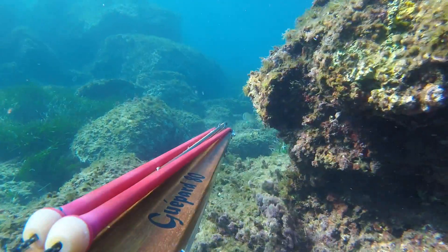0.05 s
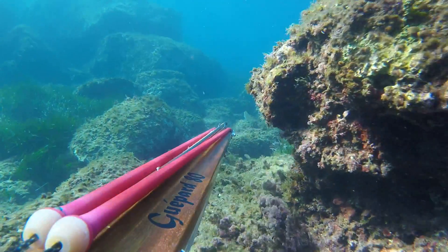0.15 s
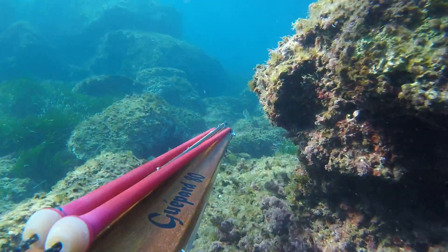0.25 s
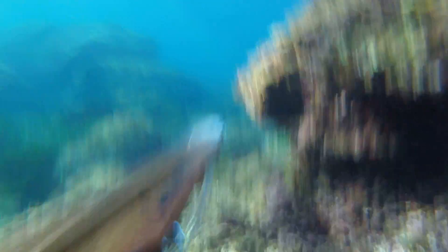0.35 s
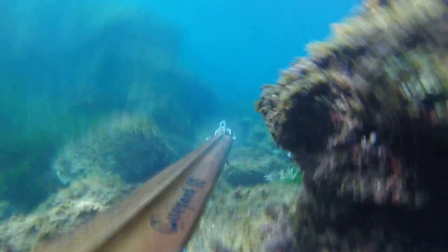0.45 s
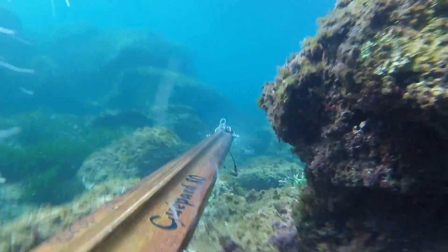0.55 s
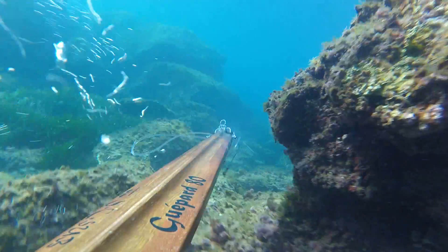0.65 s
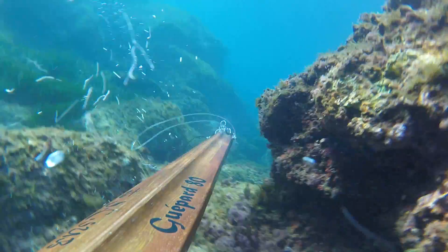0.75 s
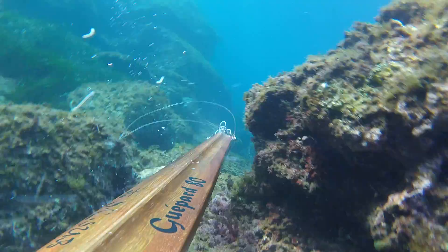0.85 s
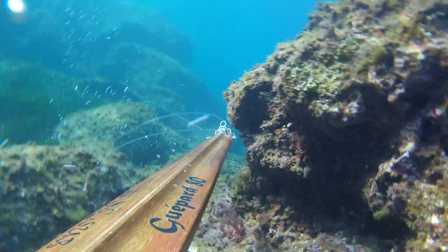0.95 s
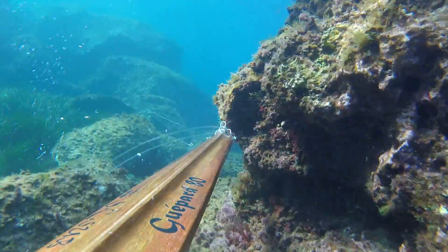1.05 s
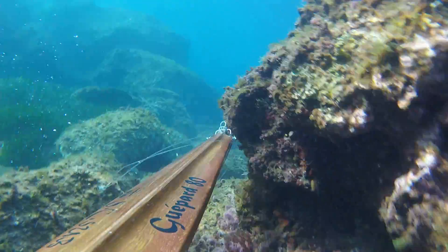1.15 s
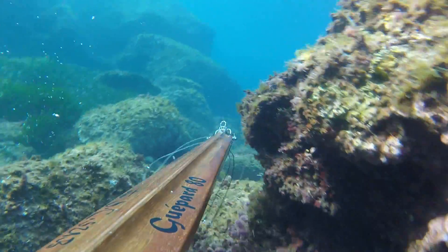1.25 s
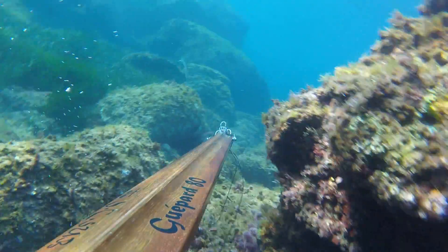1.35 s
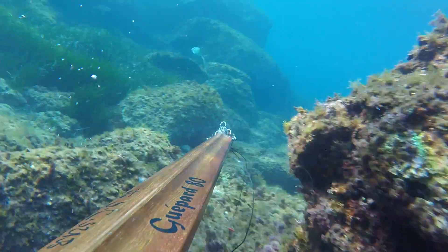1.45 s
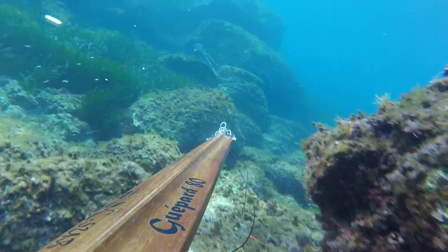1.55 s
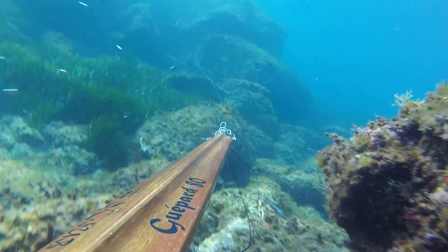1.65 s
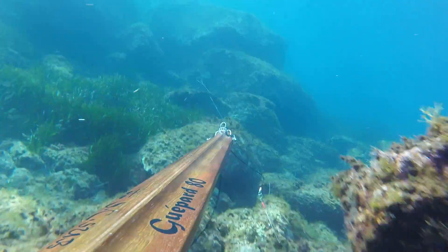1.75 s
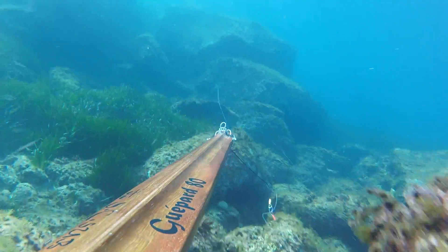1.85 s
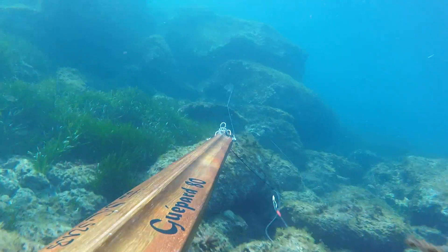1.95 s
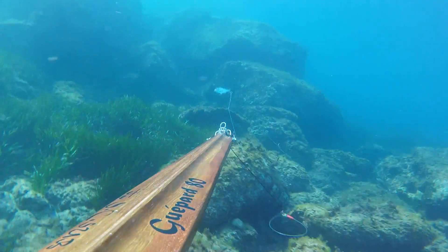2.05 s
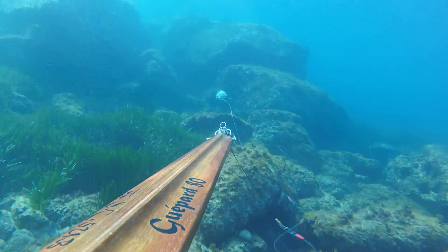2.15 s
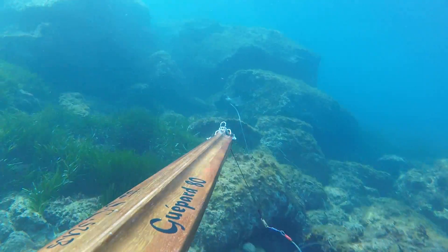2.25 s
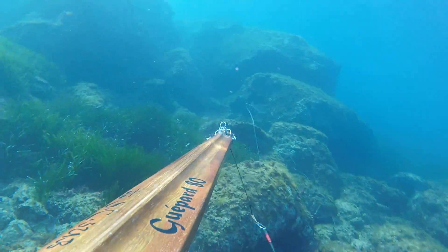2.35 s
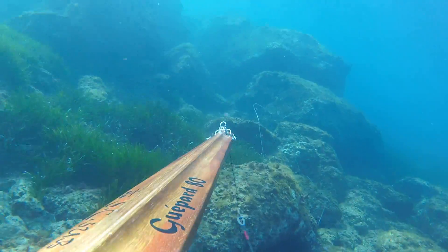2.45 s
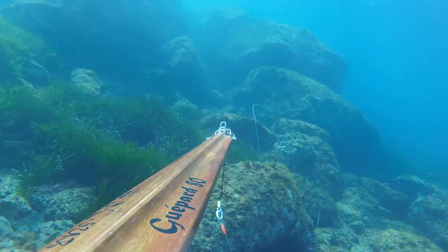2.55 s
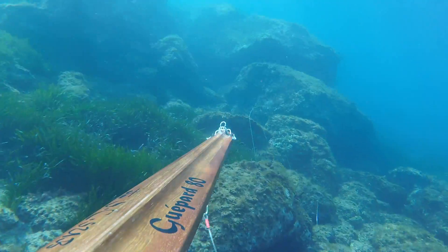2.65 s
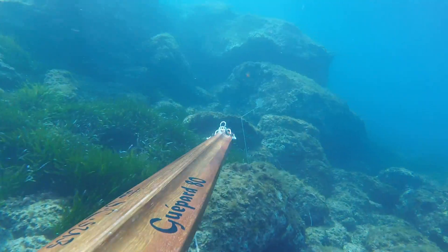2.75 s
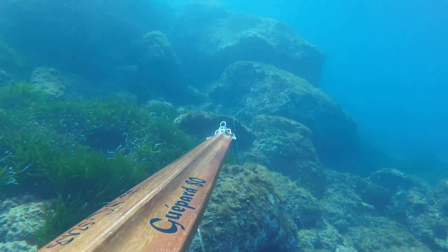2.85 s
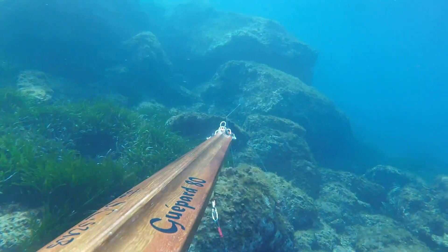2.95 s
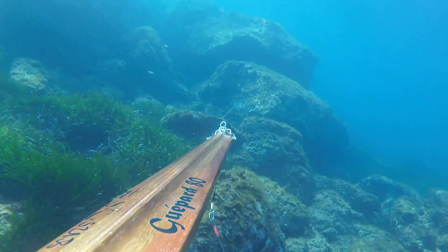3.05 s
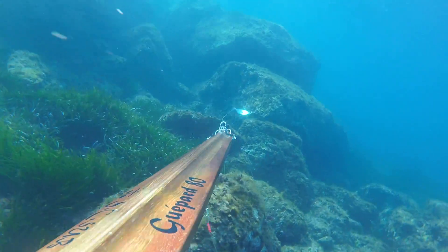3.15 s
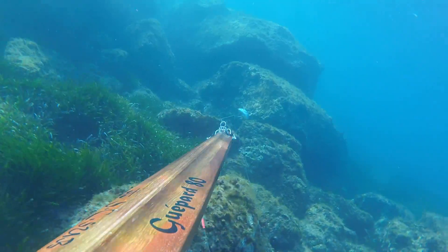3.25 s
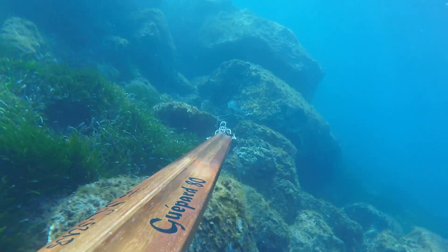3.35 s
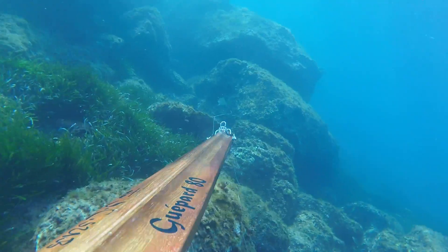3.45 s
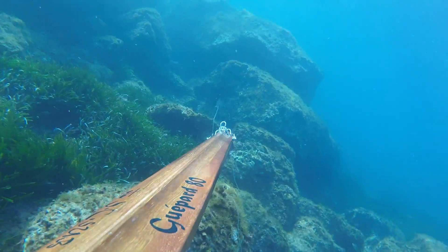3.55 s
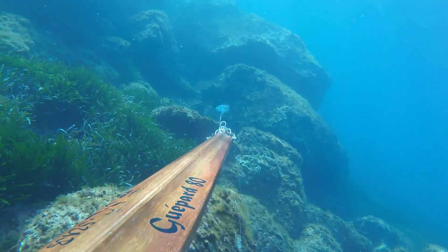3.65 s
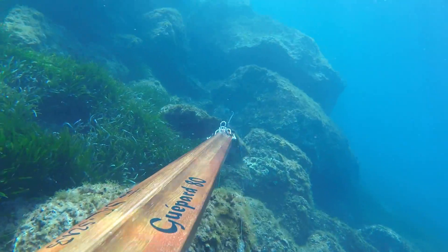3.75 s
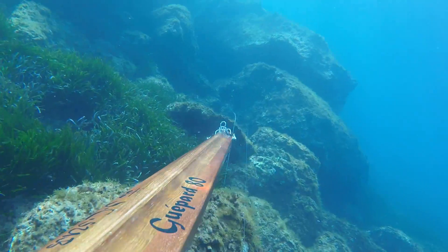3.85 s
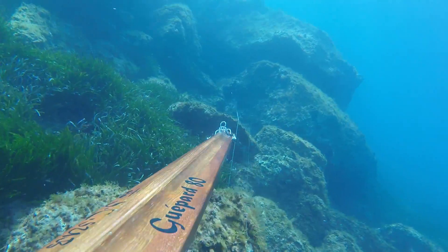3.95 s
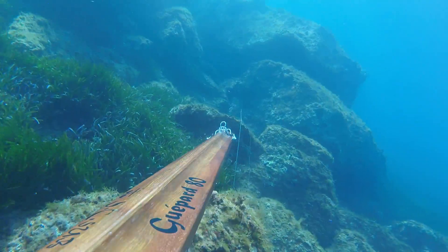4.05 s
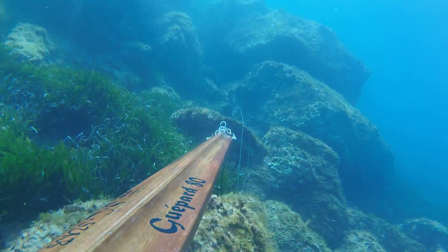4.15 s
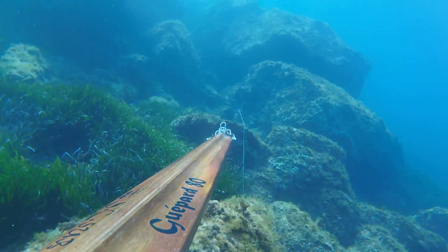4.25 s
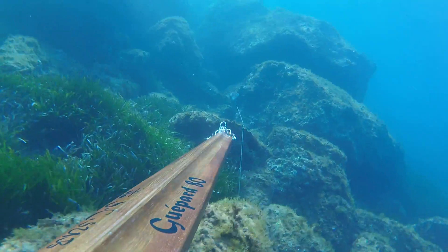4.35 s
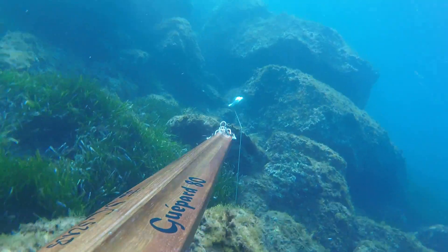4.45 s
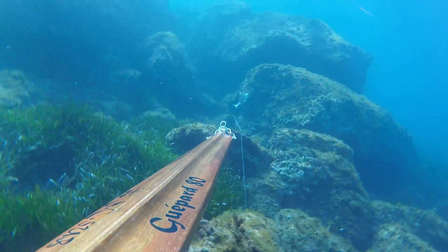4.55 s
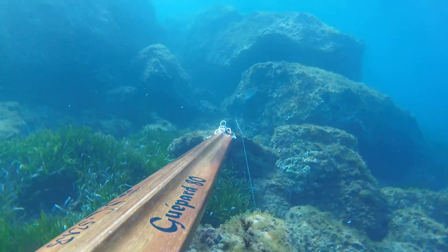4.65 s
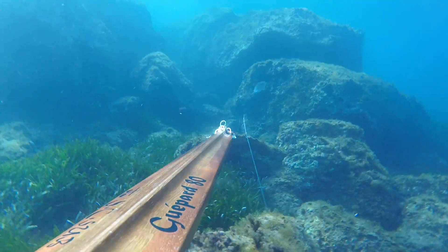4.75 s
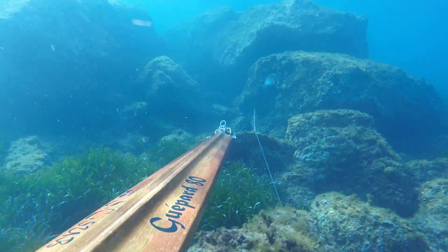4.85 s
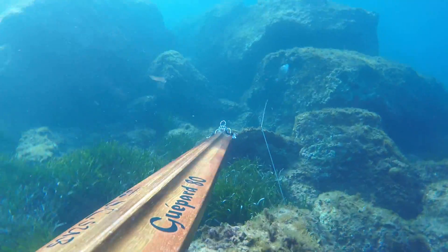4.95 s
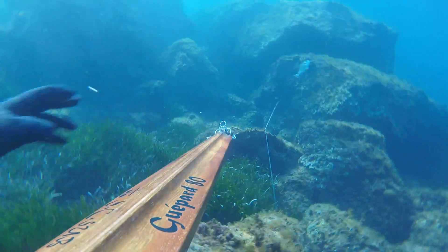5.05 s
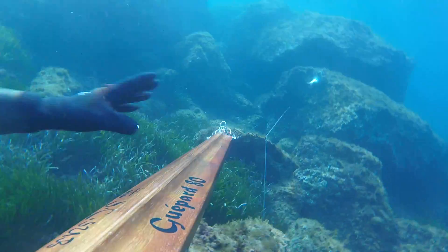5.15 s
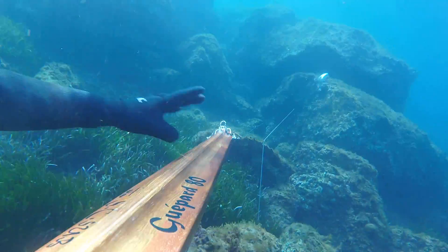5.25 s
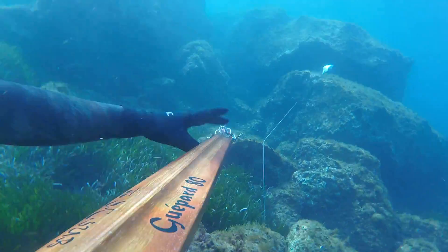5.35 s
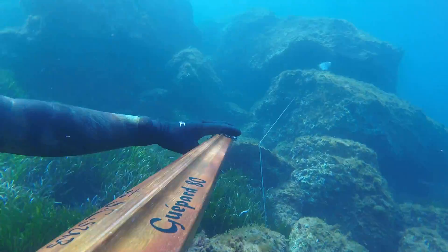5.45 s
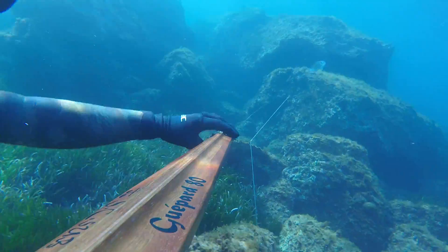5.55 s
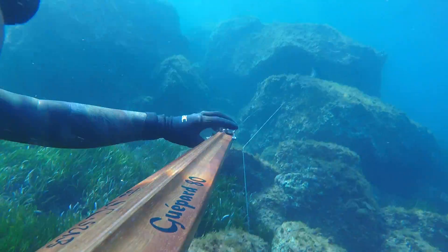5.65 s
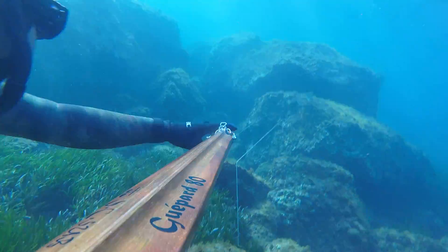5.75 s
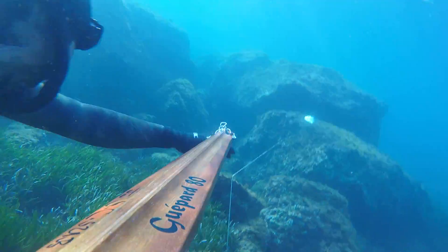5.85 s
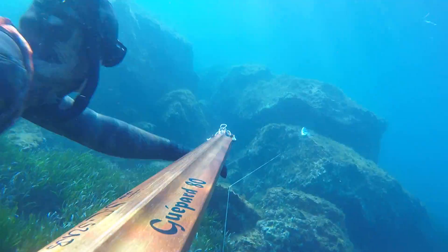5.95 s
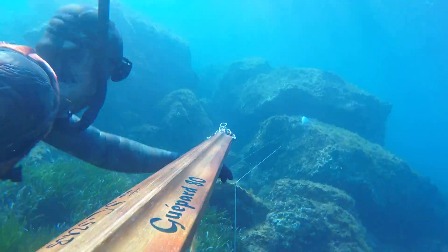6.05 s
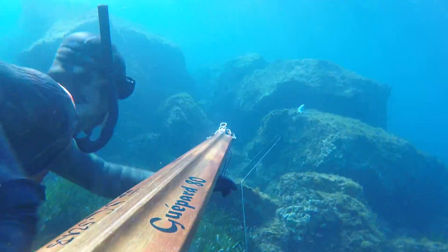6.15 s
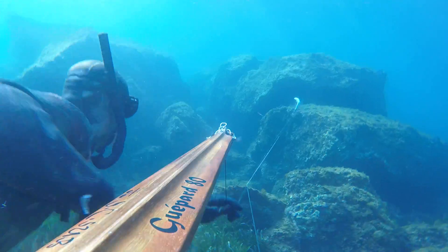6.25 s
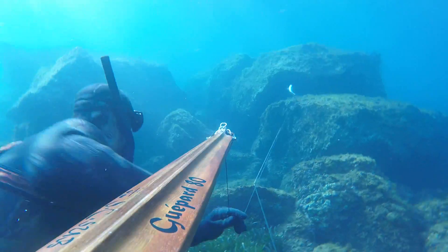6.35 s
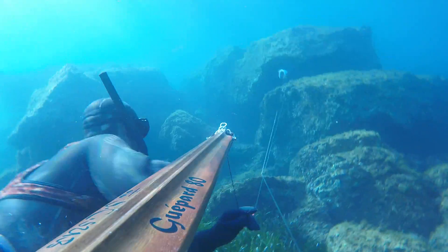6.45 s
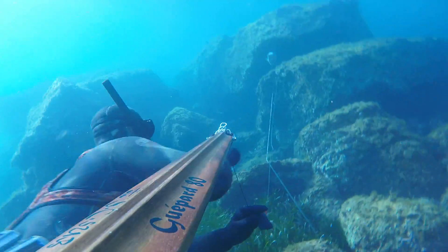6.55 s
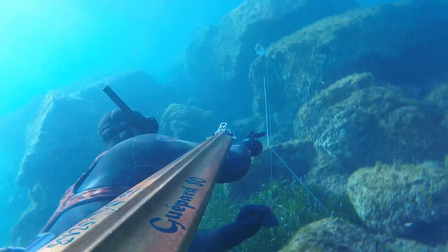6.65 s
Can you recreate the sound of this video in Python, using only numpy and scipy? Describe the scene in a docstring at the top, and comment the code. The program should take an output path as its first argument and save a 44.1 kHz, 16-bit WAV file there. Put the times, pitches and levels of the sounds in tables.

```python
"""Far shrimp crackle over a faint hiss, then a trigger clicks and a wooden speargun fires among rocks.
Place: under water. Distance: the microphone sits in a camera housing fixed to the gun's own stock.
The shot is cracks, filtered noise and pressure pulses; bubbles are sines, most gliding, over a fading fizz.
The gun trembles and the line tugs it; later the diver hauls himself forward; line, clips and hand rattle and rub.
Blows and slips are impulses with noise bursts, ringing the modes of the stock or the metal fittings."""
import sys
import numpy as np
from scipy import signal
from scipy.io import wavfile
from scipy.ndimage import uniform_filter1d

SR = 44100
rng = np.random.default_rng(int(sys.argv[2]) if len(sys.argv) > 2 else 0)


def to_wav(sig):
    """Store sig (one row per channel, or 1-D mono) as 16-bit WAV at the path in sys.argv[1].

    Samples outside -1..1 are clipped; the rate is SR.
    """
    pcm = np.clip(np.atleast_2d(sig), -1, 1) * 32767
    pcm = np.round(pcm).astype(np.int16)
    wavfile.write(sys.argv[1], SR, pcm.T)  # frames by channels


N = 295911
TIME = np.arange(N) / SR  # s from the start of the scene
AGE = np.arange(SR // 3) / SR  # s from the start of one event

# Table levels are relative: each source sets its own trims, and the housing wall colours the result.
# Event times of blows and snaps come before the short lag of their source.

# colour of the steady hiss: frequency_hz, density_db_per_hz
HISS_COLOUR = [(180, -2), (300, -7.5), (510, -6.5), (813, -23), (925, -25), (2130, -15), (3350, -21.5),
               (4540, -27), (5170, -16), (5970, -22.5), (6580, -14), (9370, -20.5), (10500, -29.5),
               (12300, -23), (14000, -59)]
# nearest shrimp: start_s, level_db
NEAREST_SNAPS = [(0.0563, -50), (0.2346, -48), (0.6908, -42.5), (1.084, -49.5), (1.4274, -46), (2.373, -45),
                 (2.6465, -42.5), (2.8, -36), (3.0167, -38.5), (3.4212, -36.5), (3.4545, -29.5),
                 (3.68, -40.5), (3.9492, -40.5), (4.258, -24), (4.361, -39), (4.5189, -39.5), (5.0785, -32),
                 (5.2639, -37)]
# colour of one shrimp snap: frequency_hz, gain_db
SNAP_COLOUR = [(600, -39), (1900, -0.5), (2700, -3), (4200, -9.5), (5300, 7.5), (5900, -4.5), (6400, 1.5),
               (7200, -10), (9300, -18), (10500, -66.5), (14000, -47.5)]
# colour of water rumbling past the housing: frequency_hz, gain_db
RUMBLE_COLOUR = [(8, -31), (20, -3.5), (31, -4.0), (45, -10.0), (70, -21.0), (150, -32), (400, -41), (1500, -104.5)]
# swings of the gun that push water past the housing: fastest_s, rise_s, fall_s, level_db
GUN_SWINGS = [(.32, 0.46, 0.091, -43), (.56, 0.084, 0.15, -26), (.92, .15, 0.64, -50),
              (1.68, .2, 0.39, -47.5), (2.0, 0.54, 0.5, -46.5), (2.52, 0.27, 0.37, -40.5),
              (3.25, 0.53, 0.18, -47.5), (4.42, 0.14, 0.17, -31), (4.63, 0.15, 0.31, -30),
              (5.2, 0.59, 0.4, -35.5), (5.54, 0.17, 0.23, -27), (5.87, 0.49, 0.98, -30.5)]
# colour of the fizz behind the shaft: frequency_hz, gain_db
FIZZ_COLOUR = [(300, 0.5), (1000, -2.5), (2500, -4.5), (6300, 0.0), (7800, -13), (10000, -29.0), (13000, -47.0)]
# single bubbles, wet squeaks and a faint steady ring, most with sliding pitch:
# start_s, peak_db, pitch_hz, glide_octaves_per_s, length_s
BUBBLES_AND_SQUEAKS = [(.1398, -34.5, 418, -7, 0.011), (.4855, -18, 950, -22.5, 0.011),
                       (0.612, -42, 8000, -39, 0.015), (0.666, -45, 3600, 8.5, 0.02),
                       (.743, -39, 6200, 0, 0.001), (0.755, -50.5, 2350, 0, 0.035),
                       (1.82, -66, 2400, 0, 0.093), (2.239, -40, 6470, -4, .0065),
                       (4.283, -40, 566, 7, 0.12), (4.8746, -22, 3690, 31, 0.0065),
                       (5.511, -44.5, 3730, 2.5, 0.016), (5.725, -31.5, 875, 5, 0.024),
                       (6.149, -36.5, 1260, 17, 0.021)]
# the gun trembling after the shot, then strokes of hand and line along the stock:
# hardest_s, rise_s, fall_s, creak_db, boom_db (against the creak), scrape_db (against the creak)
TREMBLE_AND_STROKES = [(.62, 0.037, 1, -55.5, 0.5, -8), (.92, 0.11, 0.64, -49.5, -0.5, -22.5),
                       (1.845, 0.085, 0.039, -44.5, -2, -18), (2.079, 0.35, 0.41, -50.5, 7, -13),
                       (2.53, 0.36, 0.32, -64, 10, -3), (3.044, 0.062, 0.079, -63, 10, 8.5),
                       (3.56, 0.031, .25, -59.5, 12.5, -14), (4.0, 0.2, 0.044, -57, 5, -8),
                       (4.22, 0.18, 0.12, -51.5, 6.5, -13.5), (4.334, 0.074, 0.15, -28.5, -3, -25),
                       (4.46, 0.18, 0.076, -35.5, 0.5, -13.5), (4.59, 0.028, 0.082, -50, 15.5, -20),
                       (4.67, .04, 0.068, -41, -9.5, -34), (4.87, 0.22, 0.12, -41.5, -3, -9),
                       (5.0, 0.047, 0.057, -39, -20, -10.5), (5.16, 0.15, 0.37, -36.5, -10, -10.5),
                       (5.31, 0.21, 0.12, -37.5, 5, -8), (5.54, 0.45, 0.11, -33, 2.5, -15),
                       (5.84, 0.59, 0.42, -30.5, 5.5, -11), (6.25, 0.43, 0.5, -57, -10, 5.5),
                       (6.43, 0.025, 0.047, -41, -14, -5), (6.569, 0.043, 0.051, -43.5, -4, -18)]
# colour of scraping on the stock: frequency_hz, density_db_per_hz
SCRAPE_COLOUR = [(300, -24.5), (550, -0.5), (850, -5.5), (1300, -6), (1700, -7.5), (2200, -9), (3000, -17),
                 (3800, -16), (4400, -22), (5200, -15.5), (6300, -20), (7200, -46), (10000, -44)]
# line running through the fittings: start_s, length_s, level_db
LINE_RASPS = [(1.118, 0.091, -51), (3.02, 0.044, -55), (3.09, 0.05, -59), (4.761, .18, -42)]
# clips and line striking the gun: start_s, level_db, top_db (against the level), rebound_after_s
FITTING_CLACKS = [(0.1247, -42.5, -6, 0.012), (.569, -52, -4, 0.0096), (0.63, -39, -3.5, 0.0035),
                  (.668, -52, 3, .006), (0.7757, -47, 1, 0.0026), (.912, -32, -14, 0.013),
                  (1.1648, -31.5, -16.5, 0.0023), (1.396, -48.5, -28, 0.0032), (1.969, -50, -15, .002),
                  (2.058, -49, -11, .003), (2.8425, -46, -11, .002), (3.5984, -43, -18.5, .003),
                  (3.9123, -37.5, -15.5, 0.013), (4.0941, -29.5, -10.5, .002), (4.312, -39, -2, 0.0026),
                  (4.6798, -35, -11, 0.0029), (4.773, -12.5, -27, 0.0089), (4.793, -19.5, -21, 0.0072),
                  (4.8741, -19, -13, 0.01), (4.966, -36.5, -12, 0.0024), (4.9875, -27, -12, 0.011),
                  (5.027, -30, -11.5, 0.024), (5.237, -36, -24, .003), (5.4237, -24, -28.5, .002),
                  (5.565, -23, -25, 0.0059), (5.6011, -16, -19.5, .0056), (5.6493, -20.5, -16, 0.013),
                  (5.916, -30, -13.5, 0.0032), (6.0535, -17.5, -15, 0.0097), (6.0793, -27, -40, .002),
                  (6.2465, -31.5, -19, .002), (6.286, -29.5, -38, 0.0063), (6.316, -34, -11.5, 0.02),
                  (6.4195, -28.5, -29, 0.016), (6.574, -38, -31, 0.0057)]
# knocks on the stock: start_s, level_db, weight_db (bass against the level), hardness_db (treble against the level)
STOCK_KNOCKS = [(.138, -62.5, -3, 8), (.333, -47.5, 7, -3.5), (0.887, -35, -3, -23.5),
                (0.959, -34, -9, -43), (1.257, -16, 1, -15), (1.831, -56, 9, 5.5), (2.655, -61, 4, 7.5),
                (3.032, -62.5, 3, 15), (4.321, -26.5, 0.5, -16), (4.64, -43, -8, -4.5),
                (4.872, -31, -13, 6), (5.127, -31, -4, -14), (5.821, -25.5, 6, -31)]
# registers of a knock, boom to edge: low_hz, high_hz
KNOCK_REGISTERS = [(60, 180), (190, 500), (500, 1200), (1250, 6000)]
# colour of a hard blow on the stock: frequency_hz, gain_db
SLAP_COLOUR = [(550, -4), (820, -3.5), (1150, -6.5), (1700, 6), (2600, -1.5), (6000, -5.5)]
# modes of stock and housing: frequency_hz, level_db, t60_s (ungripped)
STOCK_MODES = [(99.3, 3, 0.15), (126.6, -6, 0.22), (169, -17.5, 0.13), (216, -11.5, 0.023),
               (293.6, 5, 0.16), (343.6, 1.5, 0.074), (401.4, -1, 0.098), (530, -10.5, 0.07),
               (716, -8, 0.1), (783, -3.5, 0.06), (1040, -35, 0.055), (1370, -25, .05)]
# modes of the metal fittings: frequency_hz, level_db, t60_s (ungripped)
FITTING_MODES = [(1670, -26, 0.0077), (1910, 0, 0.029), (2194, 15, 0.016), (2400, -3, 0.024),
                 (2694, -8, 0.026), (3600, -12, 0.0063), (4970, -1, 0.0053), (5940, -6, 0.0091)]
# colour of the trigger's click: frequency_hz, gain_db
SEAR_COLOUR = [(200, -9), (900, -23), (2400, -2), (4600, -20), (6300, -14), (8000, -33), (11000, -34)]
# cracks of rubbers, wishbone and shaft: start_s, level_db, top_db (against the level)
SHOT_CRACKS = [(.412, -23, -1), (0.4174, -22, -20), (0.4383, -23.5, -4.5), (0.4434, -22.5, -9),
               (0.4568, -16.5, -7), (0.4597, -17.5, -9.5), (0.4727, -32, -6.5), (.4845, -10.5, -13.5),
               (.496, -31, -9.5), (0.5058, -34, -22), (0.559, -33, -27)]
# water shoved against the housing by the recoil: centre_s, peak_db, time_scale_s
PRESSURE_SURGES = [(.419, -20, 0.0034), (0.442, -9.5, 0.0019), (0.4873, -11.5, 0.003), (.515, -13, 0.0026)]
# colour of water torn by the shaft, and of the cracks: frequency_hz, density_db_per_hz
RUSH_COLOUR = [(59, -23), (100, -6), (153, -3), (192, 0.5), (226, -8.5), (408, -8.5), (500, -18),
               (665, -13.5), (1180, -22), (2650, -24), (3320, -37), (6370, -34.5), (9010, -55.5),
               (13000, -80.5)]
# what passes the housing wall: frequency_hz, gain_db
HOUSING_WALL = [(6500, -0.5), (9300, 1), (10500, -10), (14000, -28.5)]

MIDDLE_HZ, TOP_HZ = (1100, 3300), (3400, 12000)  # registers shared by the blows
TRIGGER_S, FIRE_S, CLEAR_S = .3757, .412, 0.505  # the sear lets go, the shaft starts, the shaft has left
SWELL_DB = 20  # what a swing or stroke gains over its rise and loses over its fall


def amp(db):
    """Decibels to gain."""
    return 10 ** (np.asarray(db) / 20)


def evened(x):
    """Scales to rms 1."""
    return x / np.sqrt(np.mean(x ** 2) + 1e-20)


def add(mix, s, sound):
    """Mixes a sound in at time s, in place."""
    part = mix[max(round(s * SR), 0):][:len(sound)]
    part += sound[:len(part)]


def band(x, lo_hz, hi_hz, order=3):
    """Causal band-pass."""
    return signal.sosfilt(signal.butter(order, [lo_hz, hi_hz], "band", fs=SR, output="sos"), x)


def colour(x, points, size=4096):
    """Causal minimum-phase filter through (Hz, dB) points, joined on a log frequency axis."""
    hz, db = np.transpose(points)
    bins_hz = abs(np.fft.fftfreq(size, 1 / SR))
    log_gain = np.log(amp(np.interp(np.log(bins_hz + 1), np.log(hz + 1), db)))
    spectrum = np.exp(signal.hilbert(log_gain).conj())
    taps = np.fft.ifft(spectrum).real[:size // 2]
    return signal.oaconvolve(x, taps)[:len(x)]


def ring(x, modes, damping=1):
    """Drives a body of decaying sine modes; a grip shortens the decays."""
    answer = sum(amp(db - 60 * AGE * damping / t60) * np.sin(2 * np.pi * hz * AGE) for hz, db, t60 in modes)
    return signal.oaconvolve(x, answer)[:len(x)]


def grains(per_s, spread_db):
    """Random train of tiny impulses of unequal size and either sign, at rms 1."""
    size = amp(spread_db * np.minimum(rng.exponential(1, N), 4))
    sign = rng.choice([-1, 1], N)
    struck = rng.random(N) < per_s / SR
    return evened(size * sign * struck)


def contact(t60, scatter, rise=0.0015, echo_db=-12, echo_t60=0.098):
    """One impulse, a burst of micro-contacts, and faint scatter off the rocks."""
    burst, echo = rng.standard_normal((2, len(AGE))) * (1 - np.exp(-AGE / rise))
    burst = burst * amp(-60 * AGE / t60)
    echo = echo * amp(-60 * AGE / echo_t60)
    tail = burst / np.linalg.norm(burst) + amp(echo_db) * echo / np.linalg.norm(echo)
    return (AGE == 0) + scatter * tail


def voiced(x, bands, dbs):
    """Sets a blow's strength in each register, as rms over a fiftieth of a second."""
    parts = [band(x, *edges) for edges in bands]
    return sum(amp(db) * p * np.sqrt(SR / 50 / np.sum(p ** 2)) for p, db in zip(parts, dbs))


def lumpy(x, patch_db, size=512):
    """Patches of louder and softer, a few hundred Hz wide and some hundredths of a second long; rms 1."""
    frames = signal.stft(x, nperseg=size)[2]
    patches = uniform_filter1d(rng.standard_normal(frames.shape), size=5, axis=0)
    patches = uniform_filter1d(patches, size=5, axis=1)
    slips = uniform_filter1d(rng.standard_normal(frames.shape[1]), size=3)  # all pitches together
    gain = amp(patch_db * (evened(patches) + .5 * evened(slips)))
    return evened(signal.istft(frames * gain, nperseg=size)[1][:N])


def froth(per_s, lo_hz, hi_hz, cycles, spread_db, count=16):
    """A crowd of tiny bubbles of many sizes, each ringing for a few cycles with a rising pitch."""
    out = np.zeros(N)
    for hz in np.geomspace(lo_hz, hi_hz, count):
        u = np.arange(0, 1, hz / cycles / SR)  # 0 to 1 through one bubble
        blip = u ** .3 * (1 - u) ** 2 * np.sin(2 * np.pi * cycles * u * (1 + .08 * u))
        out += signal.oaconvolve(grains(per_s / count, spread_db), blip / np.linalg.norm(blip))[:N]
    return evened(out)


def swell(s, rise, fall):
    """Gain of one movement: it builds to its peak at s and dies away."""
    return amp(-SWELL_DB * np.maximum((s - TIME) / rise, (TIME - s) / fall))


def together(gains, rest_db):
    """Adds movements in power over a resting level."""
    return np.sqrt(sum(g ** 2 for g in gains) + amp(rest_db) ** 2)


def hush(depth=0.036, from_s=0.78, recovery_s=1.99):
    """Background gain: it sinks to depth at the trigger, holds until from_s and creeps back over seconds."""
    back = 1 - (1 - np.clip(depth, 0, 1)) * np.exp(-np.maximum(TIME - from_s, 0) / recovery_s)
    return np.where(TIME < TRIGGER_S, 1, back)


def hiss(treble_db=-69.5, whistle_db=-71):
    """Coloured noise with a faint narrow whistling band of noise near 6.6 kHz, both sinking with the hush."""
    noise = colour(rng.standard_normal(N), HISS_COLOUR)
    noise *= amp(treble_db) / np.std(band(noise, 7200, 14000))
    whistle = evened(band(rng.standard_normal(N), 6350, 6800, order=2))
    return hush() * (noise + amp(whistle_db) * whistle)


def shrimp(top_db=-16, middle_db=-24, nearby_db=-46, nearby_spread_db=3, far_db=-69, lag=0.001, count=44):
    """The nearest snaps and a scatter of weaker ones echo off the rocks, over the crackle of far ones."""
    def snaps(rows):
        """One short, bright crack for each (s, dB)."""
        out = np.zeros(N)
        for s, db in rows:
            snap = colour(contact(t60=0.015, scatter=0.92, rise=0.0023, echo_db=-12.5), SNAP_COLOUR)
            add(out, s + lag, amp(db) * voiced(snap, [MIDDLE_HZ, TOP_HZ], [middle_db, top_db]))
        return out

    nearby = []
    for k, (when, size) in enumerate(rng.random((count, 2))):  # one snap in each equal slice of time
        s = (k + when) / count * N / SR
        nearby.append((s, nearby_db + nearby_spread_db * (2 * size - 1)))
    far = np.zeros(N)
    for _ in range(4):
        crack = contact(t60=0.01, scatter=2.5, rise=.002)
        far += signal.oaconvolve(grains(per_s=12, spread_db=5.5), crack)[:N]
    crackle = amp(far_db) * evened(colour(far, SNAP_COLOUR))
    return snaps(NEAREST_SNAPS) + hush() * (snaps(nearby) + crackle)


def flow(rest_db=-54.5):
    """Low noise: water rumbles past the housing, louder whenever the gun swings."""
    rumble = colour(rng.standard_normal(N), RUMBLE_COLOUR)
    speed = together((amp(db) * swell(s, rise, fall) for s, rise, fall, db in GUN_SWINGS), rest_db)
    return speed * evened(rumble)


def bubbles(wobble=.025, pops_db=2, wake_db=-54, wake_fade_db_per_s=35.5):
    """The wake fizzes and pops as it fades; bubbles, squeaks and a faint steady ring are wobbling sines, most sliding."""
    pops = grains(per_s=3000, spread_db=4)
    pops = pops + amp(pops_db) * froth(per_s=340, lo_hz=1300, hi_hz=7000, cycles=10, spread_db=6.0)
    fizz = lumpy(colour(pops, FIZZ_COLOUR), patch_db=3.5)
    out = amp(wake_db - wake_fade_db_per_s * (TIME - CLEAR_S)) * (TIME > CLEAR_S) * fizz
    for s, db, hz, glide, length in BUBBLES_AND_SQUEAKS:
        u = np.minimum(AGE / length, 1)  # 0 to 1 through the sound
        waver = 1 + wobble * evened(uniform_filter1d(rng.standard_normal(len(AGE)), size=60))
        turns = np.cumsum(hz * waver * 2 ** (glide * length * u)) / SR
        swelling = np.sin(np.pi * np.sqrt(u)) ** 2
        add(out, s, amp(db) * swelling * np.sin(2 * np.pi * turns))
    return out


def handling(scrape_trim_db=-1, woody_db=-4, gurgle_db=-6, tick_db=-9):
    """The trembling gun, then slips of hand and line: boom and creak in the stock, scrapes, ticks, small bubbles."""
    rest_boom_db, rest_creak_db, rest_scrape_db = -64, -69, -66.5  # gun merely held; scrape before its trim
    stock = ring(grains(per_s=900, spread_db=2), STOCK_MODES, damping=1.41)
    boom = evened(band(stock, 78, 150.4, order=2))
    creak = evened(band(stock, 325.8, 386, order=2))
    wood = evened(band(stock, 650, 1100, order=3))  # the upper modes of the wood sing along
    scrape = lumpy(colour(grains(per_s=1000, spread_db=-3.0), SCRAPE_COLOUR), patch_db=3.5)
    gurgle = froth(per_s=200, lo_hz=554, hi_hz=2190, cycles=16.2, spread_db=6.5)
    ticks = evened(ring(grains(per_s=70, spread_db=1.0), FITTING_MODES))
    scrape = scrape + amp(woody_db) * wood + amp(gurgle_db) * gurgle + amp(tick_db) * ticks

    moves = [(amp(db) * swell(s, rise, fall), weight, grit)
             for s, rise, fall, db, weight, grit in TREMBLE_AND_STROKES]
    boom_gain = together((gain * amp(weight) for gain, weight, _ in moves), rest_boom_db)
    creak_gain = together((gain for gain, _, _ in moves), rest_creak_db)
    hushed_rest_db = rest_scrape_db + 20 * np.log10(hush())
    scrape_gain = together((gain * amp(grit) for gain, _, grit in moves), hushed_rest_db)
    return boom_gain * boom + creak_gain * creak + amp(scrape_trim_db) * scrape_gain * scrape


def rasp(trim_db=1, attack=0.02, release=0.074):
    """Line dragged through the fittings catches and slips, and keeps them ringing."""
    pull = np.zeros(N)
    for s, length, db in LINE_RASPS:
        ramps = np.minimum((TIME - s) / attack, (s + length - TIME) / release)
        pull += amp(db) * np.clip(ramps, 0, 1)
    ringing = ring(grains(per_s=700, spread_db=1.0), FITTING_MODES, damping=1.44)
    return amp(trim_db) * pull * evened(band(ringing, 1000, 5000, order=2))


def clacks(ring_db=-14, top_db=-8, wood_db=-26, rebound_db=-6, lag=0.00048):
    """Small hard contacts ring the fittings for milliseconds, stir the wood, and bounce once more softly."""
    out = np.zeros(N)
    for s, db, top, rebound in FITTING_CLACKS:
        for delay, loss in ((0, 0), (rebound, rebound_db)):
            touch = contact(t60=0.021, scatter=1.0, rise=0.00046, echo_db=-14.5, echo_t60=0.08)
            tick = voiced(ring(touch, FITTING_MODES), [MIDDLE_HZ, (3400, 6900)], [ring_db, top + top_db])
            tock = voiced(ring(touch, STOCK_MODES), [(560, 2460)], [wood_db])
            add(out, s + lag + delay, amp(db + loss) * (tick + tock))
    return out


def knocks(trim_db=-2, slap_db=-8, edge_db=-9, lag=0.0019, slap_after=0.00151):
    """The line jerks at the gun and the hand bumps it: the stock modes boom, with a brief hard edge of noise."""
    out = np.zeros(N)
    for s, db, weight, hardness in STOCK_KNOCKS:
        boom = ring(1. * (AGE == 0), STOCK_MODES)
        slap = colour(contact(t60=0.035, scatter=2.0, rise=0.0005, echo_db=-20), SCRAPE_COLOUR)
        slap = colour(slap, SLAP_COLOUR)
        boom = voiced(boom, KNOCK_REGISTERS[:-1], [weight, 0, hardness])
        slap = voiced(slap, KNOCK_REGISTERS[-2:], [slap_db, edge_db])
        add(out, s + lag, amp(db) * boom)
        add(out, s + lag + slap_after, amp(db + hardness) * slap)
    return amp(trim_db) * out


def surges():
    """Recoil shoves water at the housing: pressure builds, then flips to suction."""
    out = np.zeros(N)
    for s, db, span in PRESSURE_SURGES:
        u = (TIME - s) / span
        out -= amp(db) * u * np.exp(1 - abs(u))
    return out


def quiver(start_s=.53, hz=27, level_db=-34.5, fade_db_per_s=158):
    """The slack rubbers swing on as a low, fading sine."""
    out = np.zeros(N)
    add(out, start_s, amp(level_db - fade_db_per_s * AGE) * np.sin(2 * np.pi * hz * AGE))
    return out


def rush(level_db=-28, fade_db_per_s=900):
    """Coloured grains: water torn by the shaft, fading from just before it clears the gun."""
    sliding = amp(-fade_db_per_s * np.maximum(TIME - CLEAR_S + 0.012, 0))
    return amp(level_db) * sliding * evened(colour(grains(per_s=2600, spread_db=4.0), RUSH_COLOUR))


def shot(trigger_db=-17, crack_db=-10.0, middle_db=-7, lag=0.001173):
    """Trigger click, then a tenth of a second of torn water, cracks and pressure surges; the rubbers quiver on."""
    out = surges() + quiver() + rush()
    out *= np.clip((TIME - FIRE_S) / 0.0008, 0, 1)  # silent until the shaft starts
    for s, db, top in SHOT_CRACKS:
        crack = contact(t60=0.0052, scatter=5.7, rise=0.00057, echo_db=-8.5, echo_t60=0.063)
        crack = colour(crack, RUSH_COLOUR)
        crack = voiced(crack, [(290, 1150), MIDDLE_HZ, TOP_HZ], [0, middle_db, top])
        add(out, s + lag, amp(db + crack_db) * crack)
    click = colour(contact(t60=0.0013, scatter=0.55, rise=0.00033, echo_db=-41), SEAR_COLOUR)
    add(out, TRIGGER_S, amp(trigger_db) * click / abs(click).max())
    return out


def scene():
    """Water and gun reach one microphone through the wall of the housing; the hiss is added behind it."""
    water = shrimp() + flow() + bubbles() + handling() + rasp() + clacks() + knocks() + shot()
    return (colour(water, HOUSING_WALL) + hiss())[None]


def record(dry, edge_hz=13900):
    """The recorder's band limit: a linear-phase low-pass."""
    taps = signal.firwin(255, edge_hz, window=("kaiser", 9), fs=SR)
    return signal.oaconvolve(dry, taps[None], "same")


dry = scene()
out = record(dry)
to_wav(out)
```